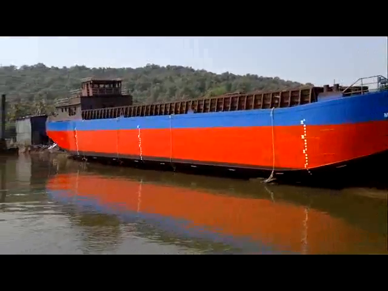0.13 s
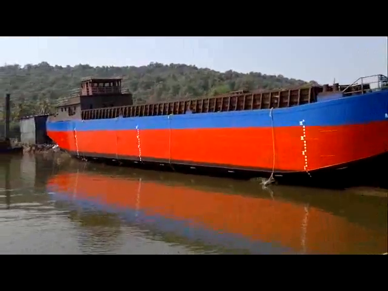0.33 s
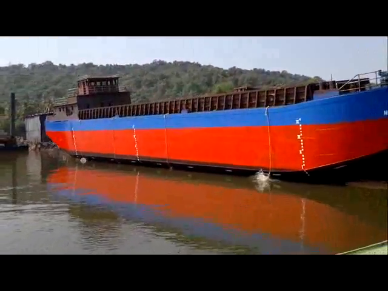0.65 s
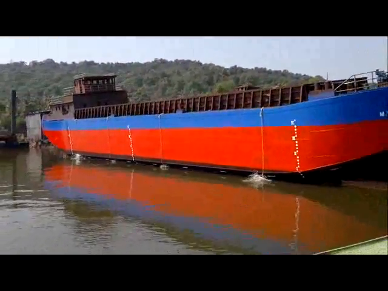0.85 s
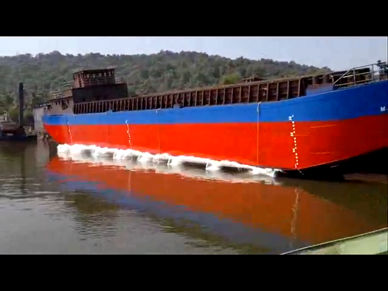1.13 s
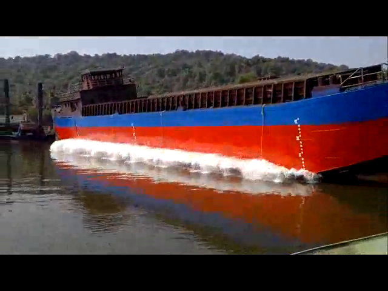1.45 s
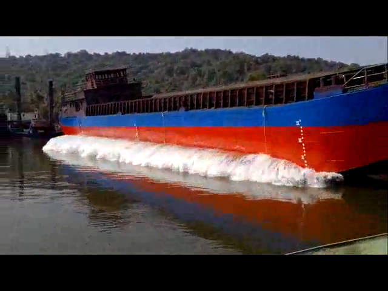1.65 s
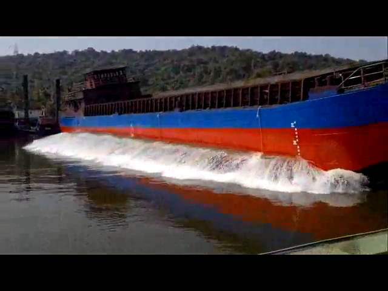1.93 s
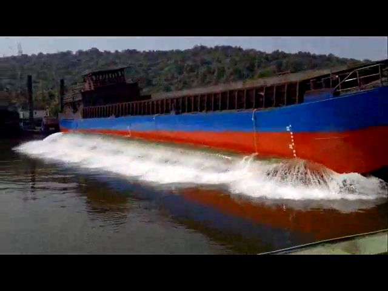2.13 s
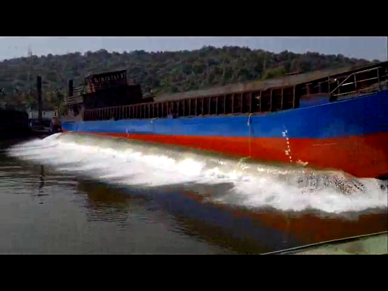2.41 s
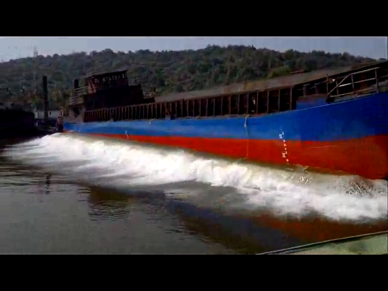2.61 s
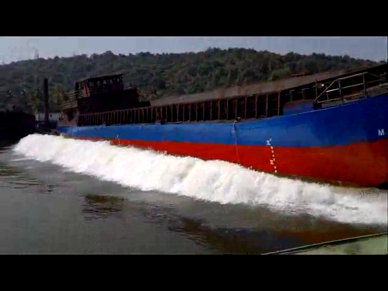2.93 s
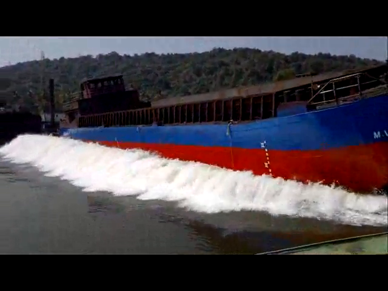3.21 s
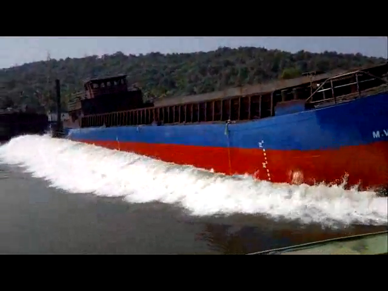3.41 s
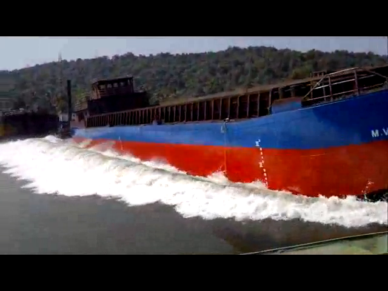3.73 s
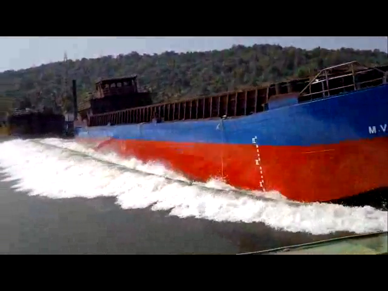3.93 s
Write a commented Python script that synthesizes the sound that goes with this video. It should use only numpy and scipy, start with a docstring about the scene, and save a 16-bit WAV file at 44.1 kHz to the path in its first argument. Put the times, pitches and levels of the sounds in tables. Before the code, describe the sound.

From 0 to 0.28 s, loose steel and chocks clank in a dense, irregular clatter: sharp cracks with short ringing rattles, slightly left. Hollow thuds at 0.25 to 0.45 s follow as the hull starts sliding, with a small splash near 0.55 s and a sparse dull clank around 0.78 s. At about 1.0 s a cluster of very deep blows peaks in a huge short boom, with splashes just after; another heavy boom lands at 1.4 s, with a few faint clanks around 1.2 s. The wave swells brightest near 1.8 to 1.9 s into a wide, hissing, foamy rush with a tumbling roar beneath. Hollow, more resonant hull slaps ring at 1.85 to 2.6 s, strongest around 2.35 and 2.5 s. The wash surges again near 3.3 s and eases slightly, with softer thuds until 4 s. Plate drumming and low wind buffeting run throughout, in open air without echo.

```python
"""Chocks and steel clank loose, each a crack and a rattle through ringing modes, as a hull slides sideways.
The empty hull drums at its plate modes under random slaps; heavier blows boom as damped swings.
A long wave rises in a river: roar, wash, spray and mist, all of random grains in flickering bands.
A breeze buffets the microphone, whose two ports hear the bass alike and the spray apart."""
import sys
import numpy as np
from scipy import signal
from scipy.fft import rfft, irfft, next_fast_len
from scipy.io import wavfile
from scipy.ndimage import uniform_filter1d, map_coordinates

SR = 44100
rng = np.random.default_rng(int(sys.argv[2]) if len(sys.argv) > 2 else 0)


def digitize_waveform(pressure):
    """Quantize a signal to 16-bit integers and store it at the path in sys.argv[1].

    Rows of a 2-D input are taken as channels; values are limited to [-1, 1].
    """
    field = np.atleast_2d(pressure).T
    bounded = np.clip(field, -1, 1)
    quanta = np.round(bounded * 32767).astype(np.int16)
    wavfile.write(sys.argv[1], SR, quanta)


def field_ratio(decibels):
    """Amplitude ratio for a level in dB (20 dB per decade); scalars and array-likes work."""
    return 10 ** (np.asarray(decibels, dtype=float) / 20)


N = 179333
T = np.arange(N) / SR
FFT_LEN = next_fast_len(N + 4096)
HZ = np.arange(FFT_LEN // 2 + 1) * SR / FFT_LEN + 1e-3

# breeze gusts: start_s, level_db
GUSTS = [(0, -29.5), (.3, -24.5), (.62, -19.5), (.9, -30.5), (1.05, -23), (1.25, -24), (1.6, -20.5),
         (2.15, -28), (2.5, -24), (2.8, -24.5), (3.2, -21.5), (3.55, -21.5), (4.07, -19)]
# breeze colour: freq_hz, level_db
BUFFET_COLOUR = [(12, -29), (20, -13.5), (43, 0.5), (59, 1), (81, -10.5), (100, -3.5), (130, -24.5),
                 (220, -120)]
# rush of sliding hull, then wave: start_s, spray_db, depth_db (roar over spray)
RUSH = [(0, -26.5, 8), (.12, -28, 6), (.27, -27.5, 4.5), (.47, -37.5, 8), (.84, -33.5, 1.5), (.95, -27, 1),
        (1.25, -25.5, -3), (1.53, -25.5, -9), (1.68, -20.5, -8), (1.8, -17.5, -4.5), (1.9, -18, -2),
        (2.071, -20, -4), (2.35, -20.5, -3.5), (2.65, -24.5, -1.5), (2.95, -22.5, -2.5),
        (3.15, -22.5, -1.5), (3.3, -20.5, -4), (3.5, -23.5, -0.5), (3.7, -26, 2), (4.07, -25.5, 1)]
# splashes over the rush: crest_s, width_s, spray_db, depth_db (roar over spray)
SPLASHES = [(.355, 0.014, -41.5, 20.5), (0.423, 0.028, -28, 3), (0.551, 0.096, -33.5, -0.5),
            (.72, 0.016, -27.5, -27), (0.763, 0.024, -39.5, 15.5), (.93, 0.012, -42, -2),
            (1.005, 0.007, -36.5, 19.5), (1.095, 0.027, -25.5, -1), (1.125, 0.032, -22.5, -3.5),
            (1.152, 0.023, -32, 10), (1.209, 0.028, -35.5, 10), (1.42, 0.031, -26.5, -8),
            (1.87, 0.049, -39.5, 11), (2.04, 0.023, -39.5, 9.5), (2.115, 0.04, -33, 12.5),
            (2.165, 0.035, -33, 12), (2.22, 0.032, -34.5, 11.5), (2.31, 0.047, -26, -7),
            (2.509, 0.055, -38, 17), (2.911, 0.096, -30, 2.5), (3.48, 0.047, -26, -2),
            (3.97, 0.032, -31, -3)]
# tumbling roar colour: freq_hz, level_db
ROAR_COLOUR = [(210, -19.5), (350, -6.5), (477, -7), (587, -2), (651, -1), (998, -7.5), (1160, -5.5),
               (1500, -15), (1950, -52.5), (3300, -120)]
# wash colour: freq_hz, level_db
WASH_COLOUR = [(850, -20.5), (1450, -18), (2600, -15.5), (3380, -16.5), (5720, -120)]
# spray colour: freq_hz, level_db
SPRAY_COLOUR = [(1500, -15), (2400, -9.5), (2900, -6), (3420, -2), (3920, -0.5), (4400, -4.5), (4890, -11),
                (6090, -12.5), (6600, -20), (7200, -30.5), (8500, -51), (12000, -96.5)]
# finest drops colour: freq_hz, level_db
MIST_COLOUR = [(3800, -30), (4700, 3), (5500, 1.5), (6300, 1.5), (7200, -25.5), (8500, -57)]
# load on the plating: start_s, drumming_db
PLATE_LOAD = [(0, -14), (.1, -24.5), (.35, -20.5), (.55, -23), (.9, -20), (1.1, -25.5), (1.3, -25),
              (1.39, -17), (1.44, -19.5), (1.58, -26.5), (2.2, -22), (2.33, -20), (2.42, -22.5),
              (2.51, -19), (2.59, -21), (2.65, -18), (2.78, -19.5), (2.96, -19.5), (3.1, -19.5),
              (3.4, -21.5), (3.85, -20), (4.07, -21.5)]
# hull plate modes: freq_hz, width_hz, level_db
PLATE_MODES = [(111, 54, -3), (155.2, 41, -2), (183.2, 22.7, 0.5), (230, 41.4, -3.5), (303, 105, -8)]
# blows on the hull, the higher ones hollow slaps of the wave:
# start_s, level_db, pitch_hz, swings_to_minus_60_db, first_swing_sign (+1 push, -1 pull)
THUDS = [(0.251, -4.5, 179, 12, 1), (0.281, -8, 111, 6.6, 1), (0.426, -6.5, 190.7, 28, 1),
         (0.7446, -9.5, 200, 9.9, 1), (0.769, -11, 97, 4, 1), (0.958, -5, 49.4, 7.6, -1),
         (0.9618, -4, 111, 4.6, -1), (0.99, -5.5, 141, 4.4, 1), (0.97, -13.5, 69.8, 3.7, 1),
         (1.0038, 4, 178, 6.3, -1), (1.0133, -4.5, 131, 3.5, 1), (1.01, -5.5, 36.6, 6.7, 1),
         (1.053, -9, 50.8, 5.4, -1), (1.064, -12, 57.3, 6, 1), (1.155, -8.5, 151, 11, 1),
         (1.198, -8.5, 54.8, 7.4, 1), (1.375, -4, 278, 24, 1), (1.418, -8.5, 149, 12, 1),
         (1.438, -8, 220, 18, 1), (1.457, -7, 99, 8, 1), (1.3997, 3, 150, 4.6, 1),
         (1.685, -5.5, 194, 5.9, -1), (1.85, -14, 718, 45, 1), (1.895, -13.5, 1140, 50, 1),
         (1.955, -9, 194, 18, 1), (2.103, -9, 616, 43, 1), (2.155, -13, 1160, 50, 1),
         (2.175, -11.5, 590, 45, 1), (2.505, -13.5, 620, 35, 1), (2.33, -8.5, 184.5, 25, 1),
         (2.358, -3, 175, 17, 1), (2.475, -8, 182, 42, 1), (2.514, -9.5, 105.4, 16, 1),
         (2.522, -3, 179, 22, -1), (2.62, -6, 160, 21, 1), (2.962, -5.5, 184.5, 12, 1),
         (3.123, -13, 114.5, 8, 1), (3.45, -8, 176, 15, 1), (3.518, -10, 55, 6.5, 1),
         (3.645, -13, 56.2, 10, 1), (3.965, -10, 121.6, 30, 1)]
# chocks and steel clanking loose: start_s, level_db, brightness_db_per_octave, rattle_t60_s
CLANKS = [(.0044, -13, 5, 0.077), (.0078, 0, -2, 0.051), (0.0123, -0.5, -5, 0.041),
          (0.0204, -10.5, -10.5, 0.031), (0.037, -12.5, 5, 0.092), (0.043, -6.5, 1, .08),
          (0.0552, -10.5, -1, 0.06), (0.067, -11.5, -1, .06), (0.0936, -18, 3, .05),
          (0.109, -15.5, -2, 0.051), (0.1333, -12.5, -6, 0.043), (0.1552, -12, 7.5, 0.033),
          (0.159, -2, -4.5, 0.045), (0.1817, -13.5, -10, .06), (0.1942, -1, 1, 0.05),
          (0.1964, -6.5, 5.5, 0.06), (.2054, -9.5, -2, 0.055), (0.224, -10, 0, 0.12),
          (0.248, -7.5, -1.5, .04), (0.2506, -7, 1.5, 0.077), (0.282, -13.5, -5.5, 0.047),
          (0.3946, -17, -6, .07), (0.7827, -20, -13, 0.036), (1.161, -16, -6, .04),
          (1.206, -13, -7.5, 0.044)]
# ringing steel modes: freq_hz, width_hz, level_db
STEEL_MODES = [(587, 100, -24), (817, 38, 3.5), (1290, 190, 1), (1614, 84, 4), (2170, 260, 3),
               (2790, 114, 9.5), (3290, 480, -0.5), (4160, 100, -1.5), (4570, 130, 0.5), (6340, 690, -6.5)]
# likeness of the two ports: freq_hz, likeness_0_to_1
PORT_LIKENESS = [(60, 0.98), (330, 0.98), (430, 0.86), (650, 1), (950, 1), (1170, 1), (1520, 0.14),
                 (1900, 0.43), (2500, 0.59), (3300, 0.44), (3650, 0.32), (4000, 0.36), (4500, .12),
                 (7000, 0.35)]
# level between the ports: freq_hz, left_minus_right_db
PORT_TILT = [(60, -6.1), (420, -4.8), (600, -2.5), (850, -4.5), (1120, 1.5), (1620, -4), (2150, -.5),
             (2850, -4), (3500, 0), (4100, 6), (5050, 11), (6000, 5.5), (6600, -1), (7200, -5)]
# phase between the ports: freq_hz, left_lead_rad
PORT_LEAD = [(0, 0), (430, 0.31), (650, 0.39), (950, 1.08), (1400, -0.2), (2100, 1.5), (2500, 2.03),
             (3200, 1.5), (3750, 1.06), (4600, 2.14), (5050, 4), (6000, 4.5), (7000, 7), (20000, 14.5)]

SPLASH_FALL_OVER_RISE = 1.55
WASH_DB, WASH_DEPTH_SHARE = -1.5, 0.59  # against spray; share of depth_db followed
MIST_DB, MIST_GROWTH = -11, 1.54  # against spray at its height; exponent on spray gain
SURFACE_LAG_S, SURFACE_DRIFT, SURFACE_DB = 0.001097, 0.2, -14  # drift: share of the lag
THUD_RISE_S, THUD_BLOOM = 0.0008, 0.04  # bloom: extra rise per period of ring beyond 10 swings
CLANK_LEFT_DB = 2.5  # left over right: the slipway lies to the left


def along(table, hz=HZ):
    """Read (Hz, value) on a log frequency axis."""
    f, v = np.transpose(table)
    return np.interp(np.log(hz), np.log(np.maximum(f, 1)), v)


def shape(x, gain):
    """Filter by a gain per frequency."""
    return irfft(rfft(x, FFT_LEN) * gain, FFT_LEN)[..., :N]


def unit(x):
    """Scale to rms 1."""
    return x / np.sqrt(np.mean(x ** 2))


def resonances(modes):
    """Sum resonator responses of alternating sign."""
    response = 0
    for k, (f, width_hz, db) in enumerate(modes):
        detune = (HZ / f - f / HZ) * f / width_hz
        response = response + (-1) ** k * field_ratio(db) / (1 + 1j * detune)
    return response


def walk(rate_hz):
    """Random levels held 1 / rate_hz, slewed twice, rms 1."""
    hold = int(SR / rate_hz)
    steps = np.repeat(rng.standard_normal(N // hold + 1), hold)
    return unit(uniform_filter1d(uniform_filter1d(steps, hold), hold)[:N])


def spread(pair, unlike=0.99):
    """Left and right from a shared and an unshared sound; smaller unlike means more alike."""
    likeness = np.clip(1 - unlike * (1 - along(PORT_LIKENESS)), 0, 1)
    mid = shape(pair[0], np.sqrt(1 + likeness))
    side = shape(pair[1], np.sqrt(1 - likeness))
    return np.array([mid + side, mid - side])


def grains(per_s, scatter_db):
    """Two streams of random ticks, a few larger than the rest."""
    hit = rng.random((2, N)) < per_s / SR
    size_db = scatter_db * np.minimum(rng.exponential(size=(2, N)), 4)
    return hit * rng.standard_normal((2, N)) * field_ratio(size_db)


def churn(colour, per_s, scatter_db, surge_db, flicker_db, flicker_hz):
    """Random grains in third-octave bands that surge together and flicker alone."""
    ticks = rfft(grains(per_s, scatter_db), FFT_LEN) * field_ratio(along(colour))
    surge = surge_db * walk(flicker_hz / 2)
    lowest_hz, highest_hz = colour[0][0], colour[-1][0]
    octaves = np.arange(0, np.log2(highest_hz / lowest_hz) + 1 / 3, 1 / 3)
    out = 0
    for centre_hz in lowest_hz * 2 ** octaves:
        band = np.cos(np.clip(3 * np.log2(HZ / centre_hz), -1, 1) * np.pi / 2) ** 2
        level = field_ratio(surge + flicker_db * walk(flicker_hz))
        out = out + irfft(ticks * band, FFT_LEN)[:, :N] * level
    return unit(spread(out))


def curve_gain(table):
    """Gain over time from (s, dB)."""
    return field_ratio(np.interp(T, *np.transpose(table)))


def breeze():
    """Wind buffets the microphone: low grains under a gust curve."""
    return curve_gain(GUSTS) * churn(BUFFET_COLOUR, 830, 3.7, surge_db=-1.0, flicker_db=1.1, flicker_hz=21)


def water_gains():
    """Roar, wash, spray gains: rush and splashes add in power; depth favours the lower layers."""
    s, db, depth_db = np.transpose(RUSH)
    lean = np.array([[1], [WASH_DEPTH_SHARE], [0]])
    power = field_ratio(np.interp(T, s, db) + lean * np.interp(T, s, depth_db)) ** 2
    for s, width_s, db, depth_db in SPLASHES:
        from_crest = (T - s) / np.where(T > s, SPLASH_FALL_OVER_RISE * width_s, width_s)
        power = power + field_ratio(db + lean * depth_db) ** 2 * np.exp(-4 * from_crest ** 2)
    return np.sqrt(power) * field_ratio(np.array([[0], [WASH_DB], [0]]))


def roar():
    """Deep water tumbles in fewer, larger grains."""
    return churn(ROAR_COLOUR, 6000, 1.63, surge_db=0.5, flicker_db=1.8, flicker_hz=21.99)


def wash():
    """Bursting bubbles: dense, even grains between roar and spray."""
    return churn(WASH_COLOUR, 12000, 0.94, surge_db=1.57, flicker_db=-0.5, flicker_hz=24.39)


def bounced(x):
    """Add the bounce off the heaving river; its lag drifts, so the colour wanders."""
    lag = SURFACE_LAG_S * SR * (1 + SURFACE_DRIFT * walk(3.935))
    read_at = np.arange(N) - lag
    bounce = np.array([map_coordinates(v, [read_at], mode="mirror") for v in x])
    return unit(x + field_ratio(SURFACE_DB) * bounce)


def spray():
    """Dense, smooth hiss of drops, heard direct and off the river surface."""
    return bounced(churn(SPRAY_COLOUR, 9000, 1.5, surge_db=0.32, flicker_db=0.88, flicker_hz=23.84))


def mist(spray_gain):
    """Finest drops: very dense high grains that grow faster than the spray."""
    peak = spray_gain.max()
    gain = field_ratio(MIST_DB) * peak * (spray_gain / peak) ** MIST_GROWTH
    return gain * churn(MIST_COLOUR, 20000, 1.5, surge_db=0.8, flicker_db=-0.1, flicker_hz=22.2)


def wave():
    """Sum the water layers, each on its own swell."""
    roar_gain, wash_gain, spray_gain = water_gains()
    return roar_gain * roar() + wash_gain * wash() + spray_gain * spray() + mist(spray_gain)


def drumming():
    """Water slaps the plating at random and the empty hull rings at its plate modes."""
    slaps = grains(per_s=2000, scatter_db=1.5) * field_ratio(0.3 * walk(22))
    body = resonances(PLATE_MODES) / (1 + (70 / HZ) ** 4) / (1 + (HZ / 450) ** 4)
    return curve_gain(PLATE_LOAD) * unit(spread(shape(slaps, body)))


def clanks():
    """Each clank: a sharp crack, then a rattle that dies, both through the ringing steel."""
    broad = field_ratio(-10.5) / (1 + (HZ / 6000) ** 4) / (1 + (500 / HZ) ** 2)
    steel = (resonances(STEEL_MODES) + broad) / (1 + (HZ / 9500) ** 6)
    jostle = 0.79 * grains(per_s=9000, scatter_db=3.0)
    dull = shape(jostle, 1 / (1 + 1j * HZ / 7000) ** 4)  # rattle lacks the crack's top octave
    octaves = np.log2(np.clip(HZ, 300, 12000) / 2000)
    out = 0
    for s, db, bright_db, t60_s in CLANKS:
        t = np.maximum(T - s, 0)
        pulse = 3.59 * np.exp(-((T - s - 0.0004) / 0.00004) ** 2)
        crack = pulse * np.array([[1], [0]])  # shared by both ports
        rattle = dull * (1 - np.exp(-t / 0.00059)) * np.exp(-np.log(1000) * t / t60_s)
        out = out + field_ratio(db) * shape(crack + rattle, field_ratio(bright_db * octaves))
    pan = field_ratio(np.array([[CLANK_LEFT_DB], [-CLANK_LEFT_DB]]) / 2)
    return spread(shape(out, steel), unlike=1.0) * pan


def thuds():
    """Each heavy blow: a slap, then damped swings whose pitch sags as the plate settles."""
    out = np.zeros(N)
    slap_band = 1 / (1 + (HZ / 1000) ** 4) / (1 + (250 / HZ) ** 2)
    slap = unit(shape(rng.standard_normal(N), slap_band))
    for s, db, hz, swings, sign in THUDS:
        t = np.maximum(T - s, 0)
        phase = 2 * np.pi * hz * (t + 0.00061 * (1 - np.exp(-t / 0.0085)))
        rise_s = THUD_RISE_S + THUD_BLOOM * max(swings - 10, 0) / hz  # long rings bloom
        envelope = (1 - np.exp(-t / rise_s)) * np.exp(-np.log(1000) * t * hz / swings)
        out += np.sign(sign) * field_ratio(db) * np.sin(phase) * envelope
        out += field_ratio(db - 32.5) * slap * (1 - np.exp(-t / 0.0024)) * np.exp(-t / 0.01)
    return np.array([out, out])


def scene():
    """Breeze, wave and hull together."""
    return breeze() + wave() + drumming() + clanks() + thuds()


def top_cut(x):
    """Nothing passes above the cut-off."""
    return signal.sosfilt(signal.butter(12, 20000, fs=SR, output="sos"), x)


def record(dry):
    """The ports differ in colour and timing; the loudest swings flatten at full scale."""
    lead_rad = np.interp(HZ, *np.transpose(PORT_LEAD))
    half = field_ratio(along(PORT_TILT) / 2) * np.exp(0.5j * lead_rad)  # half the difference on each port
    low_cut = 1 / (1 + (8 / HZ) ** 2)
    ports = np.array([shape(dry[0], half * low_cut), shape(dry[1], low_cut / half)])
    hardness = 40.0
    mix = ports / (1 + np.abs(ports) ** hardness) ** (1 / hardness)
    return top_cut(mix)


dry = scene()
out = record(dry)
digitize_waveform(out)
```